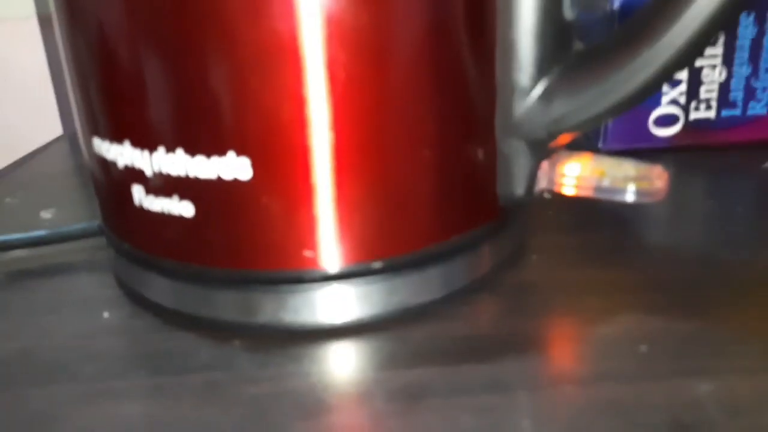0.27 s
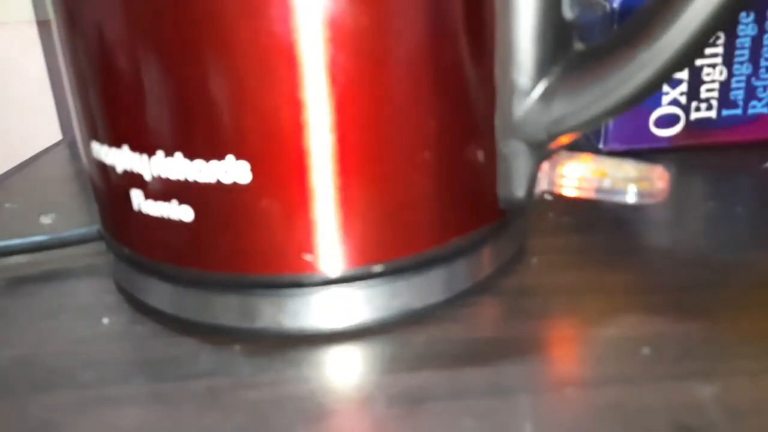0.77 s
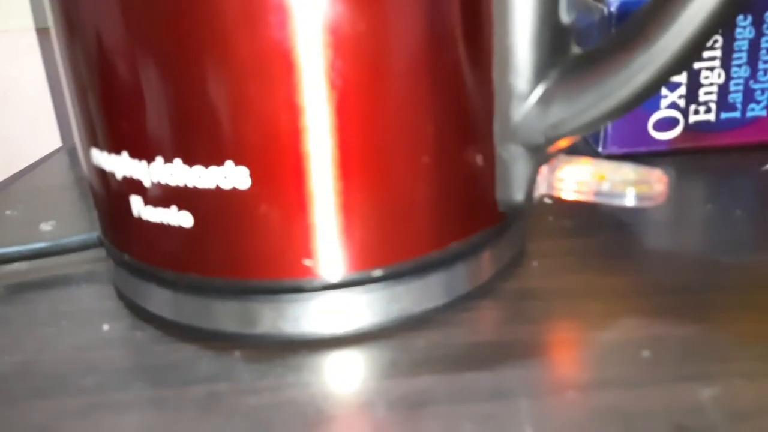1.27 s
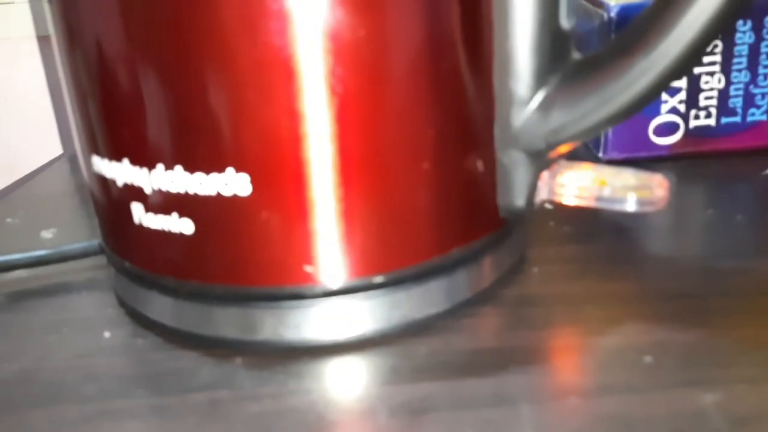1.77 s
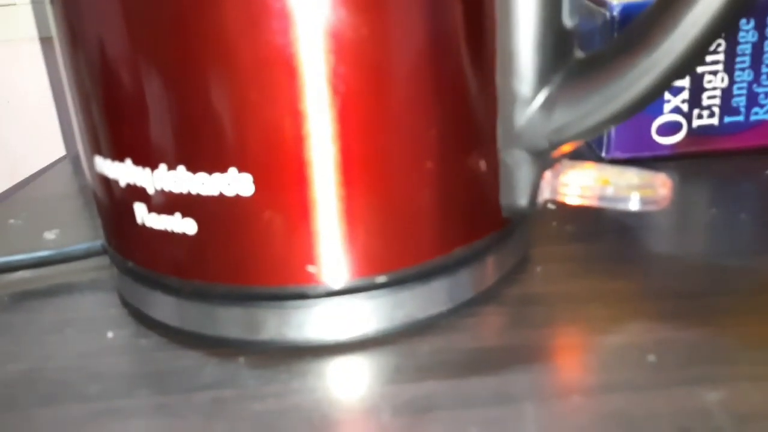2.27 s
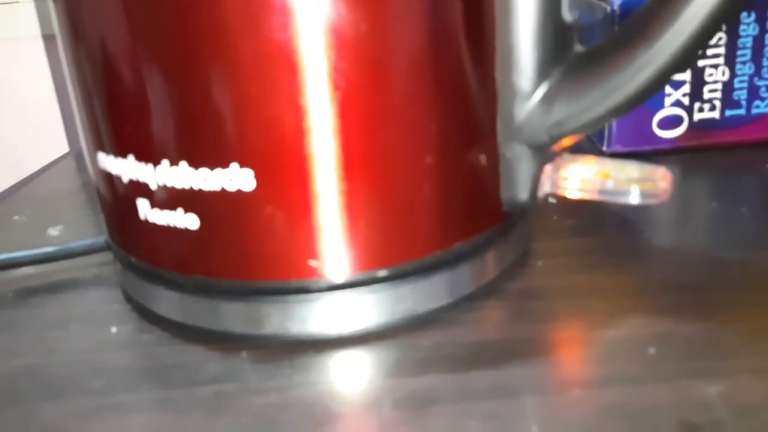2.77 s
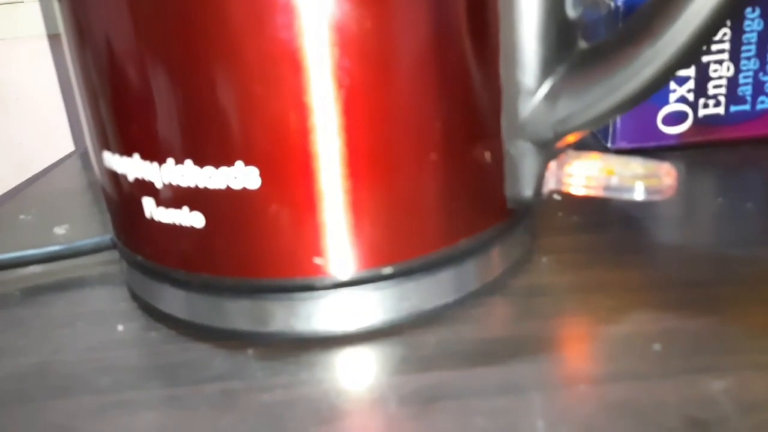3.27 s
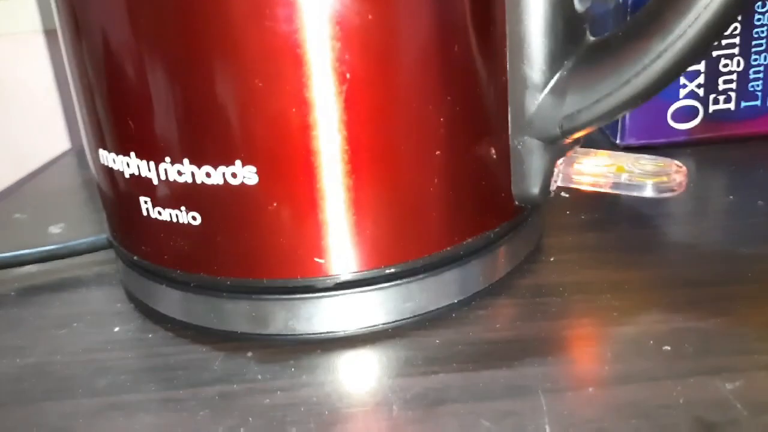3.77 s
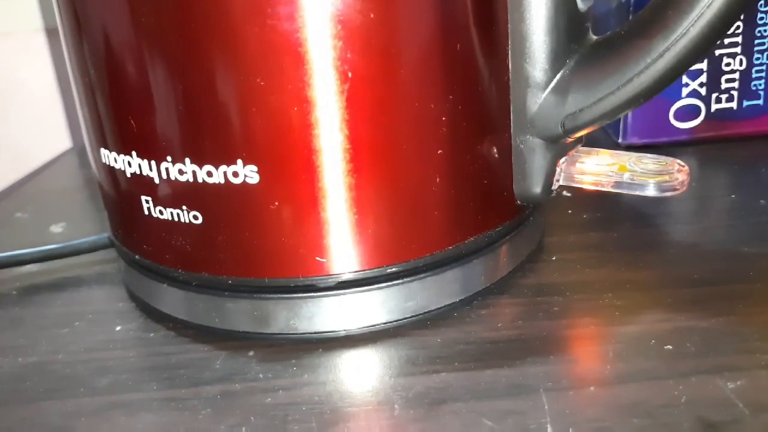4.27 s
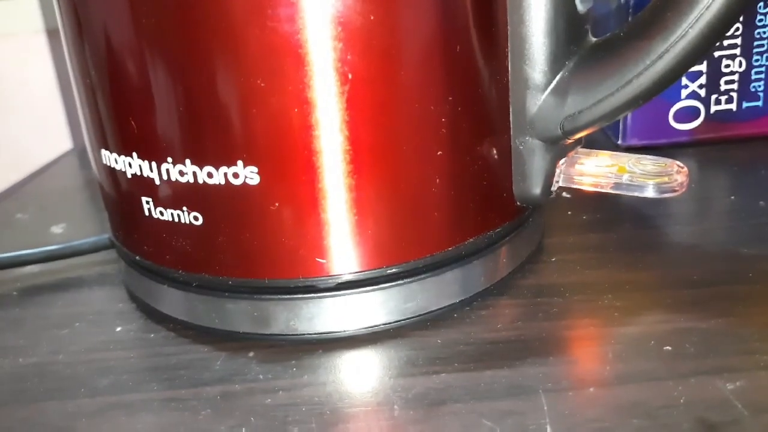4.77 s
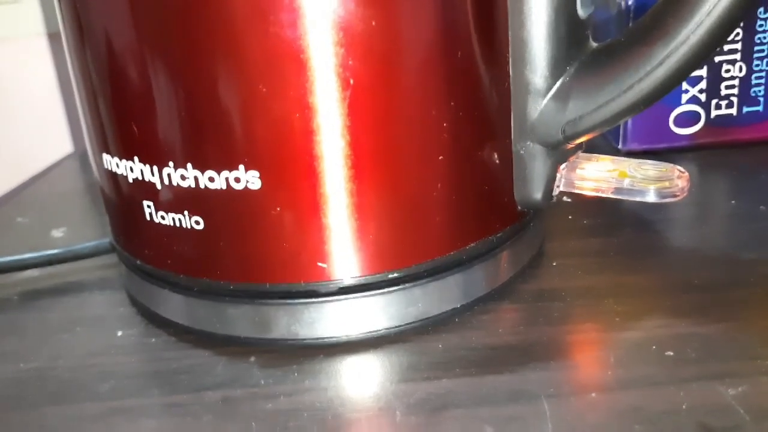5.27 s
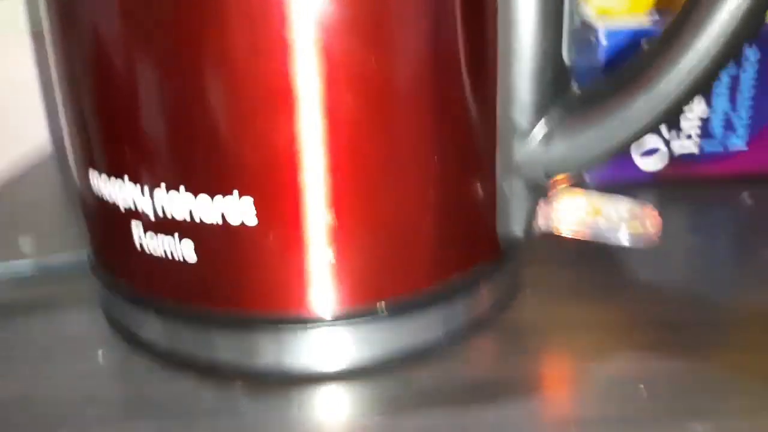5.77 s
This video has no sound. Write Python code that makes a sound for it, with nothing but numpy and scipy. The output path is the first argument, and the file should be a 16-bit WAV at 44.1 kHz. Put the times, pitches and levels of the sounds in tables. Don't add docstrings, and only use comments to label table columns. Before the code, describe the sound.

A metal electric kettle heats water on a kitchen worktop, heard very close through a hand-held phone. The sound starts faint and dull, opens up after about half a second, then holds as a grainy low roar with thin airy hiss. Occasional soft bubble thumps poke through; low hand rumble swells, and tiny case ticks come near the end.

```python
import sys
import numpy as np
from scipy import signal
from scipy.fft import rfft, irfft, next_fast_len
from scipy.io import wavfile
from scipy.ndimage import uniform_filter1d

SR = 44100
rng = np.random.default_rng(int(sys.argv[2]) if len(sys.argv) > 2 else 0)


def undo_db(level):
    steps = np.asarray(level, float) / 20
    return 10 ** steps


def transcribe(signal):
    frames = np.atleast_2d(signal).T
    limited = np.clip(frames, -1, 1)
    pcm = np.round(limited * 32767).astype(np.int16)
    wavfile.write(sys.argv[1], SR, pcm)


N = 264996

# (frequency [Hz], density [dB per Hz])
RUMBLE_SPECTRUM = [(12, -40), (25, -28), (40, -4), (52, -1), (75, 5), (100, 3.5), (125, -9), (170, -24)]
# (time [s], lift [dB])
HAND_SHIFTS = [
    (1.45, 11),
    (2.02, 5),
    (2.18, 9),
    (3.83, -1),
    (4.18, 6),
    (4.48, 2),
    (5.62, 5),
    (6.0, 14),
]
# (time [s], peak level [dB], pitch [Hz])
CASE_TICKS = [
    (.1269, -76, 12500),
    (.4886, -71, 10500),
    (5.5408, -57, 12000),
    (5.8372, -53, 12000),
    (5.9075, -62, 15000),
    (5.9535, -63, 14500),
    (5.966, -64, 14500),
]
# (frequency [Hz], width [Hz], level [dB])
BASE_MODES = [(128.3, 12, -10.5), (147, 126, -11.5), (203.7, 43, -7.5), (230.4, 10.6, 0.5), (240.2, 16, -4),
              (253.7, 22, -2), (266, 12, -5.5), (279.4, 26.6, -5)]
# (frequency [Hz], width [Hz], level [dB])
WALL_MODES = [(328, 110, -6.5), (395, 37, -3.5), (423.4, 18, -3), (447.6, 24, -3.5), (462.4, 35, -7),
              (481.5, 26, 0.5), (500, 28.5, -3), (528.3, 39, -1.5), (559.5, 33, -9.5), (600, 87, -7.5),
              (674.5, 86, -12), (742.5, 23, -14.5), (811, 150, -12), (942, 92, -19)]
# (frequency [Hz], width [Hz], level [dB])
UPPER_MODES = [(1195, 172, 4), (1520, 300, -3), (1902, 194, -3.5), (2130, 43, -5.5), (2500, 970, -11.5),
               (4400, 990, -19), (5860, 1300, -22), (7300, 970, -30.5)]
# (frequency [Hz], density [dB per Hz])
FIZZ_SPECTRUM = [(530, -12.5), (900, -0.5), (1040, -8), (1370, -10.5), (2050, -16), (3460, -19.5),
                 (5920, -28), (8800, -40.5), (9700, -37), (10100, -36.5), (12100, -36.5), (12500, -40),
                 (14400, -44), (15200, -46), (17000, -45)]
# (frequency [Hz], width [Hz], lift [dB])
STEEL_SHEEN = [(4450, 300, 0), (5850, 300, 1), (7500, 250, 1.5), (8150, 250, 2), (9250, 250, 0.5),
               (10000, 200, 0.5), (10250, 120, 1.5), (10650, 200, 1), (11500, 300, 1.5), (12050, 250, 2),
               (12750, 250, 1), (13850, 200, 2.5), (14300, 300, 2), (15000, 150, 1.5)]
# (delay [ms], level [dB])
HISS_ECHOES = [(1.7, -27), (2.9, -27), (6.6, -25), (9.3, -24), (14.5, -27), (21, -29)]
# (time [s], base lift [dB], wall lift [dB])
BOIL_SURGES = [(.27, 1, 0.5), (.53, 5, 2), (.82, 0, 0), (1.0, 1, 0), (1.12, -1, 1.5), (1.42, -0.5, 3.5),
               (1.5, -1.5, -4.5), (1.57, 3.5, 3), (1.8, -1, 1), (2.38, -1, -1), (2.85, 2.5, 0),
               (2.18, 2, 0.5), (2.62, 0.5, 1.5), (3.0, 1, 0), (3.28, 1, 0), (3.5, -1, 0), (3.83, 3, -1),
               (4.0, -1.5, 1), (4.2, -0.5, 1), (4.42, 1.5, 0.5), (4.64, -1, 0.5), (4.87, -3, 0),
               (5.08, 1, 0.5), (5.3, 0.5, -1.5), (5.8, 1, 0.5), (5.62, 1.5, -1.5)]
# (time [s], lift [dB])
CRACKLE_LIFTS = [(.3, 0), (.4, 0.5), (.46, 1), (.55, 1.5), (.7, 0.5), (.85, 0.2), (1.36, 0.7), (1.75, 0.2),
                 (2.4, 0.4), (2.6, 0.6), (3.1, 1), (3.8, 0.5), (4.3, 0.5), (5.2, -0.6), (5.75, 0)]
# (time [s], peak level [dB], pitch [Hz])
BUBBLE_PINGS = [(1.2965, -42.5, 2820), (1.35, -49, 2400), (1.42, -47, 2050), (1.471, -38, 1200),
                (1.9435, -49, 2750), (2.05, -51, 2320), (2.365, -44, 2800), (2.953, -58, 6720),
                (4.539, -38, 1200), (5.782, -43, 1200), (5.8082, -46, 2770)]
# (time [s], peak level [dB], pitch [Hz])
WALL_THUMPS = [(0.39, -26, 480), (0.524, -25.5, 495), (0.682, -32, 516), (1.248, -9, 538),
               (1.647, -10, 525), (2.314, -31, 425), (2.728, -8.5, 490), (2.893, -16, 596),
               (4.481, -17, 474), (4.638, -7.5, 487), (5.054, -33, 493), (5.764, -9, 466),
               (5.941, -44, 534)]
# (time [s], centre [Hz])
BAND_GAPS = [(.064, 14600), (.6, 12500), (.897, 9400), (1.37, 12400), (2.136, 15200), (2.476, 8600),
             (2.67, 13100), (2.86, 9400), (2.902, 9450), (2.923, 5400), (3.225, 9300), (3.27, 13200),
             (3.565, 8600), (4.313, 13800), (4.993, 13150), (5.19, 10900), (5.59, 8700), (5.796, 10250)]

BASE_DB, WALL_DB, RUMBLE_DB = 11, 13, -17
WANDER_DB, WANDER_HZ = -0.28, 2.4
SHIFT_S, SURGE_S, CRACKLE_S = 0.055, 0.097, 0.094
LULL_DB, LULL_S, LULL_LEAD_S = -3, 0.002, 0.0022
SHUT_DB, OPEN_DB, OPENS_S, SETTLE_S, STEP_DB = -56, -43, 0.49, 0.34, 1
THIN_HZ, THIN_DB, THIN_UNTIL_S = 13500, -3, 0.45


def evened(x):
    return x / np.sqrt(np.mean(x ** 2) + 1e-20)


def slope(points, hz):
    f, db = np.transpose(points)
    return undo_db(np.interp(np.log(hz + 1), np.log(f + 1), db, -120, -120))


def resonance(hz, centre_hz, width_hz):
    return 1 / (1 + (2 * (hz - centre_hz) / width_hz) ** 2)


def humps(modes, hz, steep):
    return np.sqrt(sum(undo_db(db) ** 2 * resonance(hz, f, width) ** steep for f, width, db in modes))


def low_cut(hz, corner_hz, order):
    return 1 / (1 + (corner_hz / (hz + 1)) ** order)


def coloured(x, gain):
    size = next_fast_len(2 * len(x))
    spectrum = rfft(x, size) * gain(np.fft.rfftfreq(size, 1 / SR))
    return evened(irfft(spectrum, size)[:len(x)])


def drift(rate_hz):
    return coloured(rng.standard_normal(N), lambda hz: 1 / (1 + (hz / rate_hz) ** 2))


def bumps(times_s, lifts_db, width_s):
    t = np.arange(N) / SR
    return sum(db * np.exp(-((t - s) / width_s) ** 2) for s, db in zip(times_s, lifts_db))


def rings(events, lift_db, rise_s, fall_s):
    out, t = np.zeros(N), np.arange(3000) / SR
    envelope = (1 - np.exp(-t / rise_s)) * np.exp(-t / fall_s)
    for s, db, hz in events:
        part = out[round(s * SR):][:len(t)]
        ring = undo_db(db + lift_db) * envelope * np.sin(2 * np.pi * hz * t)
        part += ring[:len(part)]
    return out


def opening_db():
    since_s = np.arange(N) / SR - OPENS_S
    climb_db = OPEN_DB + (SHUT_DB + STEP_DB - OPEN_DB) * np.exp(-since_s / SETTLE_S)
    return uniform_filter1d(np.where(since_s < 0, SHUT_DB, climb_db), size=4000)


def hand_rumble():
    level_db = RUMBLE_DB + 5.5 + bumps(*np.transpose(HAND_SHIFTS), SHIFT_S)
    return undo_db(level_db) * coloured(rng.standard_normal(N), lambda hz: slope(RUMBLE_SPECTRUM, hz))


def case_ticks():
    return rings(CASE_TICKS, 21, rise_s=0.00015, fall_s=0.00012)


def collapses(per_s, spread_db):
    size = undo_db(spread_db * np.minimum(rng.exponential(1, N), 4)) * rng.choice([-1., 1.], N)
    return size * (rng.random(N) < per_s / SR)


def flecks(per_s, low_hz, high_hz, cycles):
    out, t = np.zeros(N), np.arange(1500) / SR
    for hz in np.geomspace(low_hz, high_hz, 16):
        ring = t * np.exp(-t * hz / cycles) * np.sin(2 * np.pi * hz * t)
        out += signal.oaconvolve(collapses(per_s, 4.8), ring)[:N]
    return evened(out)


def large_bubbles():
    pings = rings(BUBBLE_PINGS, 9.2, rise_s=0.0013, fall_s=0.0039)
    thumps = rings(WALL_THUMPS, -1.5, rise_s=0.0034, fall_s=0.005)
    return pings + thumps


def patchy(x, depth_db, from_hz):
    hz, _, z = signal.stft(x, SR, nperseg=512)
    patches = uniform_filter1d(rng.standard_normal(z.shape), size=7, axis=0)
    patches = evened(uniform_filter1d(patches, size=4, axis=1))
    gain_db = low_cut(hz[:, None], from_hz, 4) * depth_db * patches
    return evened(signal.istft(z * undo_db(gain_db), SR, nperseg=512)[1][:N])


def hiss():
    upper = coloured(collapses(9000, 3.24), lambda hz: humps(UPPER_MODES, hz, 1.37) * low_cut(hz, 500, 3))
    fizz = coloured(collapses(30000, 0.25), lambda hz: slope(FIZZ_SPECTRUM, hz))
    fizz = patchy(fizz, 1.0, 6000)
    high = undo_db(-1.5 + 0.24 * drift(26)) * upper + undo_db(-2.0 + 0.23 * drift(21)) * fizz

    def sheen(hz):
        return undo_db(sum(db * resonance(hz, f, width) for f, width, db in STEEL_SHEEN))

    high = np.std(high) * coloured(high, sheen)
    return high + sum(undo_db(db) * np.roll(high, round(ms * SR / 1000)) for ms, db in HISS_ECHOES)


def kettle():
    surge_s, base_lift_db, wall_lift_db = np.transpose(BOIL_SURGES)
    base_db = BASE_DB + 0.4 + WANDER_DB * drift(WANDER_HZ) + bumps(surge_s, base_lift_db, SURGE_S)
    wall_db = WALL_DB + 1.0 + WANDER_DB * drift(WANDER_HZ) + bumps(surge_s, wall_lift_db, SURGE_S)
    lull_s = np.transpose(WALL_THUMPS)[0] - LULL_LEAD_S
    wall_db = wall_db + bumps(lull_s, np.full(len(lull_s), LULL_DB), LULL_S)
    hiss_db = bumps(*np.transpose(CRACKLE_LIFTS), CRACKLE_S)
    base = coloured(collapses(6000, 1.9), lambda hz: humps(BASE_MODES, hz, 2.3) * low_cut(hz, 95, 4))
    wall = coloured(collapses(6000, 1.88), lambda hz: humps(WALL_MODES, hz, 1.98) * low_cut(hz, 200, 3))
    return undo_db(base_db) * base + undo_db(wall_db) * wall + undo_db(hiss_db) * hiss()


def scene():
    small_bubbles = undo_db(-14.5) * flecks(per_s=30, low_hz=1420, high_hz=3276, cycles=2.1)
    steady = undo_db(opening_db()) * (hand_rumble() + small_bubbles + kettle())
    return (steady + case_ticks() + large_bubbles())[None]


def roll_off(x):
    return signal.sosfilt(signal.butter(12, 15720, fs=SR, output="sos"), x)


def record(dry):
    hz, t, z = signal.stft(dry, SR, nperseg=256, noverlap=192)
    for s, centre_hz in BAND_GAPS:
        z[:, abs(hz - centre_hz) < 380] *= undo_db(-17 * np.exp(-((t - s) / 0.008) ** 4))
    early = 1 / (1 + (t / THIN_UNTIL_S) ** 8)
    z *= undo_db(THIN_DB * np.outer(low_cut(hz, THIN_HZ, 16), early))
    mix = signal.istft(z, SR, nperseg=256, noverlap=192)[1][:, :N]
    return roll_off(mix)


dry = scene()
out = record(dry)
transcribe(out)
```